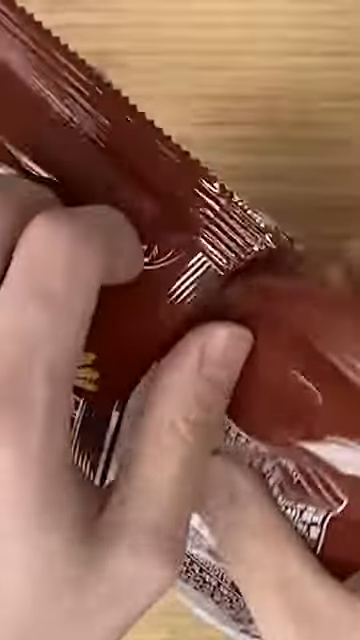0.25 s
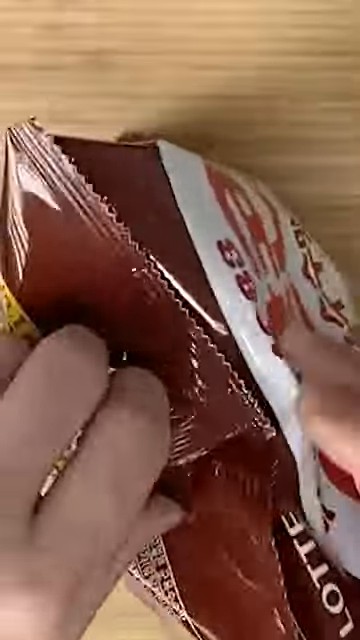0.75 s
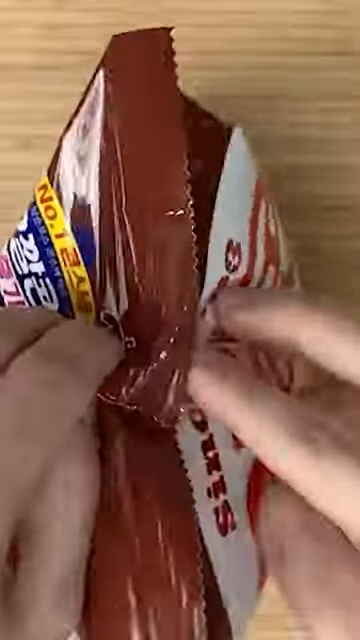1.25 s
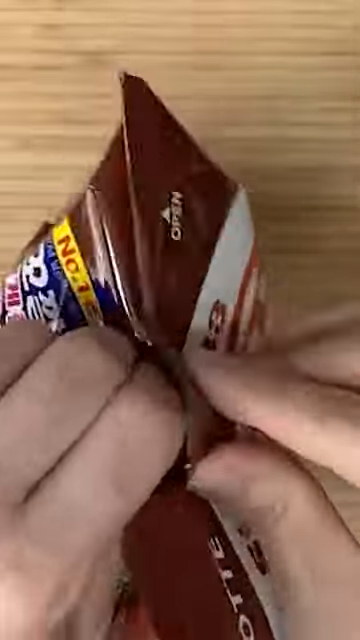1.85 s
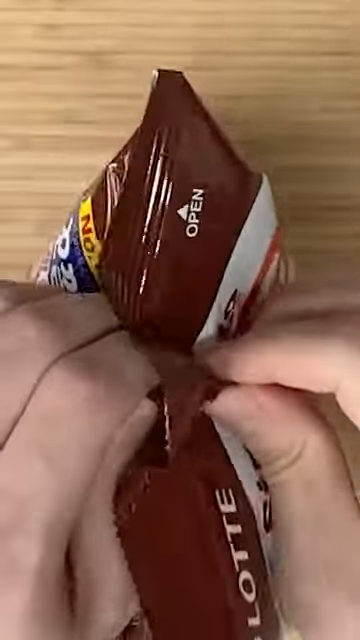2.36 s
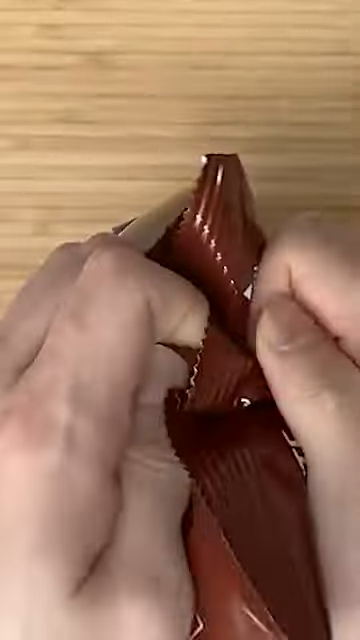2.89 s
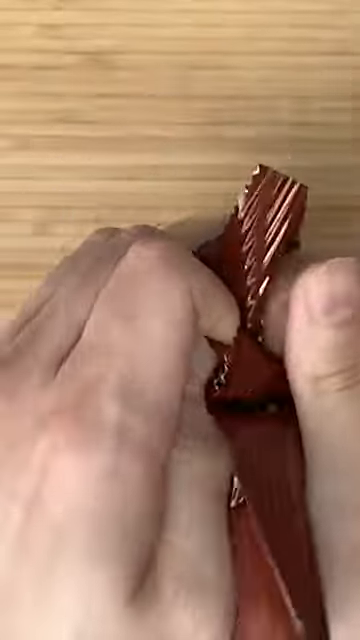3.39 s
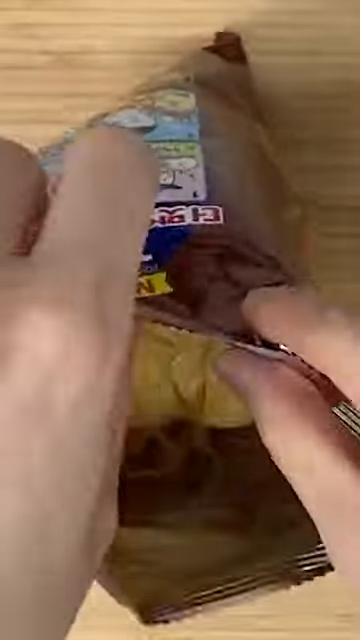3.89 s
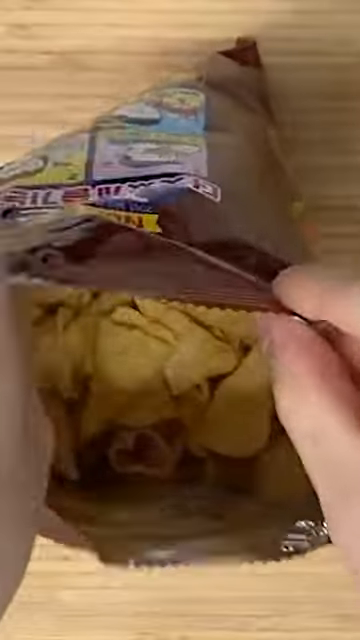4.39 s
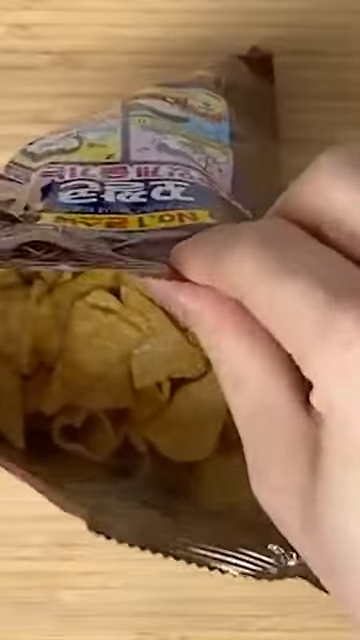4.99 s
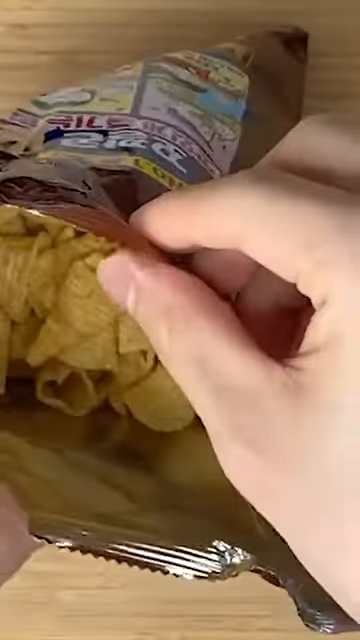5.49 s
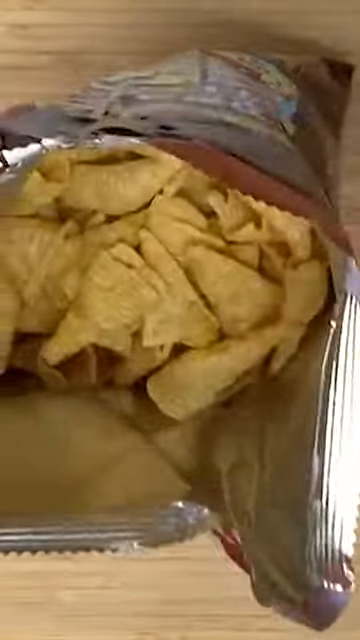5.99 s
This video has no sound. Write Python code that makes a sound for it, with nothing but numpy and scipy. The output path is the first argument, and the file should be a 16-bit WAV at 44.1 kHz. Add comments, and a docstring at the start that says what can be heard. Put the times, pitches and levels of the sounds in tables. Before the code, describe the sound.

Close crinkling of a foil snack bag being handled and pulled open, with sharp snaps, soft thumps and a brief peeling hiss.

```python
"""A metallised plastic snack bag crackles as it is gripped, creased, pulled open and spread.
Creases in the film buckle with sharp snaps over a rustle of countless small ones. Fingers slide
on the film with a hiss, and the air-filled bag thumps as its walls pop in and out.
The bag is held close to one mono microphone, in a small quiet room that answers the snaps."""
import sys
import numpy as np
from scipy import signal
from scipy.fft import rfft, irfft, next_fast_len
from scipy.io import wavfile
from scipy.ndimage import map_coordinates

SR = 44100
rng = np.random.default_rng(int(sys.argv[2]) if len(sys.argv) > 2 else 0)


def generate_wav(sig):
    """Save sig (samples, or channels by samples) to the path in sys.argv[1] as 16-bit PCM at SR."""
    pcm = np.round(np.clip(np.atleast_2d(sig).T, -1, 1) * 32767).astype(np.int16)
    wavfile.write(sys.argv[1], SR, pcm)


N = 275625


def amp(db):
    return 10 ** (np.asarray(db) / 20)


def unit_rms(x):
    return x / np.sqrt(np.mean(x ** 2) + 1e-20)


def along(points, hz):
    """Read between (Hz, value) points on a log frequency axis."""
    point_hz, values = np.transpose(points)
    return np.interp(np.log(hz + 1), np.log(point_hz + 1), values)


def coloured(x, spectrum):
    """x through a causal filter with this spectrum and unit power gain."""
    size = 8192
    gain = amp(along(spectrum, np.fft.rfftfreq(size, 1 / SR)))
    cepstrum = irfft(np.log(gain))
    cepstrum[1:size // 2] *= 2
    cepstrum[size // 2 + 1:] = 0
    response = irfft(np.exp(rfft(cepstrum)))
    return signal.fftconvolve(x, response / np.linalg.norm(response))[:N]


def wobble(rate):
    """A smooth random curve, rate knots a second."""
    knots = rng.standard_normal(int(N * rate / SR) + 4)
    return map_coordinates(knots, [np.arange(N) * rate / SR])


def scatter(starts, rows):
    """Each row of samples summed into the signal at its start in seconds."""
    at = np.round(starts * SR).astype(int).reshape(-1, 1) + np.arange(rows.shape[1])
    return np.bincount(at.ravel(), rows.ravel(), N + SR)[:N]


# The quiet room at the microphone. Each row: frequency in Hz, relative level in dB.
ROOM_TONE = [(60, 5), (800, -34), (6000, -54), (16000, -65)]
def room_tone():
    """The room's steady floor: faint noise, mostly low rumble."""
    return amp(-55.5) * coloured(rng.standard_normal(N), ROOM_TONE)


# The small room's decay. Each row: frequency in Hz, time to fall 60 dB in seconds.
ROOM_DECAY = [(300, 0.21), (2000, 0.14), (6000, 0.071)]
def room_answer(x):
    """Reflections reach the microphone, the treble dying first; two tails take turns."""
    hz, t, spectra = signal.stft(rng.standard_normal((2, SR // 4)), SR, nperseg=256)
    decay = amp(-60 * t / along(ROOM_DECAY, hz)[:, None])
    tails = signal.istft(spectra * decay, SR, nperseg=256)[1]
    turn = np.pi * np.arange(N) / SR / 0.3
    halves = x * np.array([np.cos(turn) ** 2, np.sin(turn) ** 2])
    return signal.fftconvolve(halves, tails / np.linalg.norm(tails[0]), axes=1).sum(axis=0)[:N]


# A whole wall of the bag pops in or out. Each row: start in seconds, level in dB, pitch in Hz.
WALL_POPS = [(0.187, -19, 143), (0.619, -20, 191), (0.678, -23, 150), (0.6998, -14.5, 460),
             (0.823, -19.5, 504), (1.127, -22, 131), (1.193, -16.5, 160), (1.27, -13.5, 304),
             (1.693, -16.5, 180), (1.727, -17.5, 247), (1.84, -24, 83.4), (1.941, -15.5, 96),
             (1.944, -17.5, 254), (2.329, -22, 260), (2.406, -8.5, 220), (2.588, -12, 360),
             (3.952, -23, 85), (4.099, -15, 90.6), (4.119, -12.5, 92), (4.66, -14.5, 211),
             (4.664, -16.5, 75), (5.587, -18, 84.5), (5.734, -9, 118), (5.873, -23, 83.4),
             (5.888, -14, 110)]
def thumps():
    """The trapped air cushions the wall: a soft push of about two cycles."""
    start, db, hz = np.transpose(WALL_POPS)[..., None]
    t = np.arange(SR // 8) / SR
    age = hz * t / 0.35  # the push peaks 0.35 cycles in
    drift = np.cumsum(0.035 * rng.standard_normal(age.shape), axis=1)  # the creased wall moves unevenly
    return scatter(start, amp(db) * np.sin(2 * np.pi * hz * t + drift) * age * np.exp(1 - age))


# The bag's colours from close up. Each row: frequency in Hz, relative level in dB.
CRINKLE = [(500, -50.5), (1100, -5.5), (2000, 0.5), (3300, -3.5), (5400, -5), (6500, -10.5), (9000, -42)]  # the body of the creasing film
SHEEN = [(4000, -27.5), (6500, -2.5), (9000, -2), (12000, -6.5), (15500, -14.5)]  # its bright top
WALL = [(90, -7.5), (200, 0.5), (400, -4.5), (750, -4.5), (1100, -10), (2000, -41)]  # the shaking walls
FLEX = [(12, -32), (30, -0.5), (80, -2.5), (120, -3), (260, -49.5)]  # the slow flexing of the bag
# How hard the hands work. Each row: time in seconds, creasing in dB, shaking of the walls in dB.
HANDLING = [(0.0, -23.5, -29), (0.1, -40, -35), (0.5, -36, -40.5), (0.72, -34, -35.5), (0.97, -38, -42),
            (1.395, -38.5, -37), (1.46, -38, -37.5), (1.58, -44.5, -45), (1.9, -31.5, -37),
            (2.181, -38.5, -41), (2.23, -44, -45.5), (2.42, -40, -34.5), (2.7, -24.5, -37),
            (2.97, -39, -49), (3.08, -34, -38.5), (3.33, -37, -46), (3.55, -27.5, -42.5), (3.9, -55.5, -52),
            (4.12, -27.5, -31.5), (4.23, -47.5, -44), (4.5, -33.5, -38), (4.62, -45.5, -50),
            (4.7, -37, -40.5), (5.03, -47, -44.5), (5.162, -37.5, -34.5), (5.26, -43, -43),
            (5.381, -60.5, -56.5), (5.54, -49.5, -47), (5.62, -34.5, -30.5), (5.741, -25.5, -30.5),
            (5.831, -45, -45.5), (5.889, -27.5, -26.5), (5.962, -39, -46.5), (5.985, -57, -53),
            (6.05, -63, -51.5), (6.17, -35.5, -39), (6.25, -47, -47)]
def rustle():
    """Small creases give way in clumps; every one shakes film and wall together."""
    firm_grip_db, flex_limit_db, open_s = -35, -31.5, 3.89
    now = np.arange(N) / SR
    when, *levels = np.transpose(HANDLING)
    crinkle_db, wall_db = [np.interp(now, when, level) for level in levels]
    sheen_db = -42.5 + 1.22 * (crinkle_db - firm_grip_db)
    flex_db = -38 + 1.1 * (np.minimum(wall_db, flex_limit_db) - firm_grip_db)
    flex_db += 7.5 * (now > open_s)  # once open, the bag flexes more freely

    chance = rng.random((1500, 5))  # a row for each crease
    starts = chance[:, 0] * N / SR
    size_db = -4.5 * np.log(1 - 0.98 * chance[:, 1:2])  # many faint creases, a few strong ones
    mix_db = 10 * (chance[:, 2:] - [0.5, 0.8, 0.5])  # each has its own mix of body, sheen and wall
    t = np.arange(400) / SR
    fade_db = -60 * t / 0.0058
    creases = np.array([scatter(starts, amp(size_db + db[:, None] + fade_db)) for db in mix_db.T])
    clumps = amp(2.2 * wobble(25) + 2.2 * wobble(90))
    body, sheen, wall = unit_rms(clumps * (creases + 0.8)) * rng.standard_normal((3, N))
    flexing = amp(2.8 * wobble(16)) * coloured(rng.standard_normal(N), FLEX)
    return (amp(crinkle_db) * coloured(body, CRINKLE) + amp(sheen_db) * coloured(sheen, SHEEN)
            + amp(wall_db) * coloured(wall, WALL) + amp(flex_db) * unit_rms(flexing))


def glide(noise, start, length, first_hz, last_hz):
    """Noise through a broad resonance that moves from one pitch to another."""
    hz, t, spectra = signal.stft(noise, SR, nperseg=512)
    centre_hz = first_hz * (last_hz / first_hz) ** np.clip((t - start) / length, 0, 1)
    octaves = np.log2((hz[:, None] + 1) / centre_hz)
    gain = amp(np.minimum(20 * octaves, -10 * octaves))  # dB per octave under and over the centre
    gain /= np.sqrt(np.mean(gain ** 2, axis=0))
    return signal.istft(spectra * gain, SR, nperseg=512)[1][:N]


# Fingers slide on the film or the seal peels apart. Each row: start and length in seconds, level
# in dB, first and last pitch in Hz, sheen and wall in dB against the level, release in seconds.
SLIDES = [(0.087, 0.16, -36.5, 950, 1380, -8, -3, 0.013), (0.232, 0.2, -33.5, 1030, 2680, -4.5, -7, 0.1),
          (3.582, 0.2404, -32, 2100, 3320, -3.5, -21.5, 0.022),
          (3.838, 0.043, -33.5, 3000, 3570, -20, -17, 0.003)]
def hisses():
    """Fine friction: a rise, a grainy hold whose pitch climbs as the film tightens, a release."""
    attack_s, slip_db, grain_db = 0.02, 2.5, 2.5
    total = np.zeros(N)
    for start, length, db, first_hz, last_hz, sheen_db, wall_db, release_s in SLIDES:
        t = np.arange(N) / SR - start
        envelope = np.clip(np.minimum(t / attack_s, 1 + (length - t) / release_s), 0, 1)
        friction = amp(slip_db * wobble(30) + grain_db * wobble(900)) * rng.standard_normal((4, N))
        resonance = glide(friction[0], start, length, first_hz, last_hz)
        bright = unit_rms(np.diff(friction[1], prepend=0))  # friction is brighter than creasing
        sheen = amp(sheen_db) * coloured(bright, SHEEN)
        wall = amp(wall_db) * coloured(friction[2], WALL)
        body = amp(-4) * coloured(friction[3], CRINKLE)
        total += amp(db) * envelope * (resonance + body + sheen + wall)
    return total


# The bag's wall after a snap. Each row: frequency in Hz, relative level in dB.
SHUDDER = [(120, -20.5), (250, -4.5), (500, 1), (900, -1.5), (2000, -32.5)]
# Creases buckle close to the microphone. Each row: start in seconds, level in dB, ring in Hz,
# sheen and after-shiver in dB against the level.
BUCKLES = [(0.0316, -17, 2730, -12, -17), (0.067, -22, 3670, -19, -8), (0.2476, -17.5, 2370, -4, -10.5),
           (0.286, -17.5, 3470, -3, -12.5), (0.4142, -16, 1760, 2, -20), (0.5469, -17, 3400, 0, -18),
           (0.5731, -8.5, 2300, -1, -19), (0.5967, -14.5, 5150, -1.5, -14), (0.6869, -14, 2460, -8, -14),
           (0.701, -14, 6300, -14, -8.5), (0.7535, -11.5, 5030, -11, -15), (0.818, -22.5, 2500, -29, -6.5),
           (0.855, -26, 3960, -27, -15), (0.915, -23, 2400, -19, -19), (0.9384, -18.5, 2040, -7, -10),
           (0.964, -21, 3570, -12, -8.5), (1.031, -11.5, 1870, -17, -23), (1.0699, -16, 1800, -33, -13.5),
           (1.0955, -20, 2220, 0, -7.5), (1.1113, -11.5, 4050, -0.5, -16.5), (1.1387, -12.5, 1970, -7, -12),
           (1.1414, -5.5, 1470, -8, -23.5), (1.1873, -18.5, 3580, 1, -4.5), (1.2215, -13.5, 2490, -24, -19),
           (1.2639, -6.5, 1940, -4.5, -12.5), (1.3242, -7.5, 2400, -14, -24), (1.372, -19, 2580, -5, -21),
           (1.439, -10, 2380, -10.5, -17.5), (1.4623, -14, 4700, -3, -9.5), (1.532, -21.5, 2320, -32, -12),
           (1.5832, -21, 2480, -18, -25), (1.621, -24, 2310, -13, -11), (1.6503, -17, 1910, -21, -12.5),
           (1.6934, -15, 2260, -3, -11.5), (1.7697, -18.5, 2350, -11, -10.5),
           (1.818, -14, 5400, 2.5, -13.5), (1.8446, -6.5, 4400, -3, -13.5), (1.9452, -7.5, 2060, -4, -14),
           (1.99, -3, 4940, -1.5, -33), (2.0559, -28, 4430, -16, -4.5), (2.1087, -13.0, 3730, 4, -17),
           (2.149, -21, 5750, -14, -3), (2.2466, -19.5, 2700, -19, -18), (2.283, -22, 3320.0, -7, -10.5),
           (2.3895, -18, 2200, -17, -7), (2.4547, -7.5, 2480, -6.5, -11.5), (2.526, -15, 2950, -27, -31),
           (2.5618, -36, 3830.0, -10, -23), (2.5864, -13, 2500, -11, -14), (2.59, -0.5, 2220, -25, -27),
           (2.664, -3.5, 2050, -4, -13.5), (2.682, -8.5, 4470, -5, -10.5), (2.6894, -7, 5560, -11, -30),
           (2.701, -17, 2730.0, 4.5, -9.5), (2.7408, -17, 2730, 2.5, -12), (2.778, -7, 6260, -4, -26),
           (2.7828, -11, 3520, 3.5, -14.5), (2.7914, -7.5, 3400, 4, -20), (2.8084, -11.5, 3470, -1, -12.5),
           (2.8154, -6, 5600, -3, -32), (2.8444, -12, 2930, -3, -14), (2.857, 0.5, 2770, -2.5, -20.5),
           (2.8884, -12.5, 4380, -10, -12), (2.8977, -13, 1360, -3, -10), (2.929, -12.5, 2400, -6, -25),
           (3.001, -15.5, 2460, -4, -7), (3.0038, -15, 5360.0, 5.5, -19.5), (3.0131, -12.5, 5300, -4, -6),
           (3.039, -10.5, 4670, 1.5, -12), (3.0578, -11.0, 5300, -7, -8), (3.0721, -10.5, 4800, 5.5, -14.5),
           (3.0987, -1, 5400, -5, -12.5), (3.1109, -1.5, 5300, -17, -17.5), (3.1464, -7.5, 5650, -1, -20),
           (3.157, -11.5, 2530, -7, -24), (3.1978, -22, 2550, -29, -8), (3.2101, -6.5, 3420, -1.5, -11.5),
           (3.2353, -15.5, 5700, -4, -22), (3.2487, -14.5, 5600, -7, -18), (3.2552, -9, 1810, -7, -20.5),
           (3.274, -16.5, 3800, -2, -13), (3.2861, -12, 5500, -3.5, -16.5),
           (3.2941, -9.5, 1360.0, -13, -19), (3.359, -11, 3600, -5, -18.5), (3.367, -6.5, 2160, -4, -17.5),
           (3.3794, -10.5, 5700, -4.5, -7), (3.4052, -13, 4540, -6, -15), (3.438, -5.5, 3420.0, -1, -26),
           (3.4792, -4, 1630, 0, -18), (3.5264, -5.5, 2230, -7, -24), (3.5495, -5, 2280, -34, -12),
           (3.61, -17, 4470, -1, -6.5), (3.6598, -6.5, 4730, -2.5, -27), (3.686, -14, 2390, -18.0, -25),
           (3.9353, -16, 4070, -3.5, -17), (3.9775, -21, 1990, -19.0, -16), (4.0004, -18, 2530, 3, -26),
           (4.0182, -14, 5500, -6, -16.5), (4.0662, -15, 1680.0, -5, -29), (4.1137, -8, 3470, -4.5, -17),
           (4.1235, -9, 2580, -1, -17), (4.1602, -6.5, 3630, -2.5, -21), (4.1867, -15.5, 2090.0, -18, -27),
           (4.259, -27.5, 2640, -25, -13), (4.302, -26.5, 2300, -20, -6.5), (4.343, -22.5, 2280, -14, -13),
           (4.4187, -18, 2370.0, -3, -14), (4.47, -15, 4040, -6, -35), (4.4839, -16, 5700, -1.5, -9),
           (4.5167, -13, 5600, -1, -6.5), (4.64, -21, 2730.0, -9, -21), (4.661, -18.5, 3020, -23, -4),
           (4.669, -20, 4300, 1, -15), (4.7527, -13, 2580, -3.5, -13.5), (4.8403, -18.5, 1570.0, -11, -32),
           (4.8896, -16.5, 1370, -7.5, -17), (4.94, -15, 2120, -27, -21), (4.9727, -11.5, 5270, -24, -18),
           (5.054, -24, 3950, -11, -18), (5.1, -22.5, 1480, -12, -9), (5.1713, -11, 2800, -8, -16.5),
           (5.4942, -28, 3500, -2, -15.5), (5.578, -13, 4070, -16, -18), (5.6225, -19.5, 5830, -3, -21),
           (5.6476, -18, 2690.0, -4, -26), (5.699, -18.5, 1910, -12, -22), (5.735, -14.5, 5620.0, 3, -13),
           (5.8836, -14, 2120, -0.5, -7.5), (5.943, -22, 4360, -5, -16.5), (6.0605, -35, 5000, 1, -13),
           (6.104, -28, 3450, -8, -10), (6.1228, -23.5, 5350, 1, -18), (6.1672, -17.5, 2480, -13.0, -13.5)]
def snaps():
    """A crease flips: the patch around it rings briefly and cracks, then film and wall shiver on."""
    ring_t60_s, shiver_t60_s, crack_t60_s = 0.0049, 0.0033, 0.003
    start, db, hz, sheen_db, after_db = np.transpose(BUCKLES)[..., None]
    t = np.arange(SR // 20) / SR
    jitter, body, sheen, wall = rng.standard_normal((len(start), 4, len(t))).swapaxes(0, 1)

    def fade(from_db, t60_s):
        return amp(from_db - 60 * t / t60_s)

    flip = amp(db) * (1 - np.exp(-t / 0.00016))
    after = amp(db + after_db) * (1 - np.exp(-t / 0.00074))  # the after-shiver builds more slowly
    drift = np.cumsum(0.25 * jitter, axis=1)  # the loose film holds no steady phase
    ring = np.sin(2 * np.pi * hz * t + drift) * flip * fade(3.5, ring_t60_s)
    thinness = np.clip(0.25 * np.log2(hz / 1500), 0, 0.95)  # a small, high patch has less body
    thinned = body - thinness * np.roll(body, 1, axis=1)
    shiver = thinned * (flip * fade(2.5, shiver_t60_s) + after * fade(6, 0.032))
    crack = sheen * amp(sheen_db) * (flip * fade(3.5, crack_t60_s) + after * fade(-1, 0.042))

    when, creasing_db, shaking_db = np.transpose(HANDLING)
    slack_db = 0.45 * np.interp(start, when, shaking_db - creasing_db)  # a taut wall shudders less
    patch_db = 8.5 - 3.5 * np.log2(hz / 2000)  # larger, lower patches shake the wall more
    shudder = wall * after * fade(patch_db + slack_db, 0.023)
    return (scatter(start, ring) + coloured(scatter(start, shiver), CRINKLE)
            + coloured(scatter(start, crack), SHEEN) + coloured(scatter(start, shudder), SHUDDER))


def scene():
    """The bag up close, the room behind it; one microphone feeds both channels."""
    direct = snaps()
    mono = direct + amp(-7) * room_answer(direct) + rustle() + hisses() + thumps() + room_tone()
    return np.array([mono, mono])


def record(dry):
    """The recorder rounds off the loudest peaks and keeps nothing above its band limit."""
    ceiling, top_hz = 0.68, 15900
    rounded = dry / (1 + np.abs(dry / ceiling) ** 4) ** (1 / 4)
    size = next_fast_len(N + SR // 2)
    in_band = np.fft.rfftfreq(size, 1 / SR) < top_hz
    return irfft(rfft(rounded, size) * in_band, size)[:, :N]


dry = scene()
out = record(dry)
generate_wav(out)
```